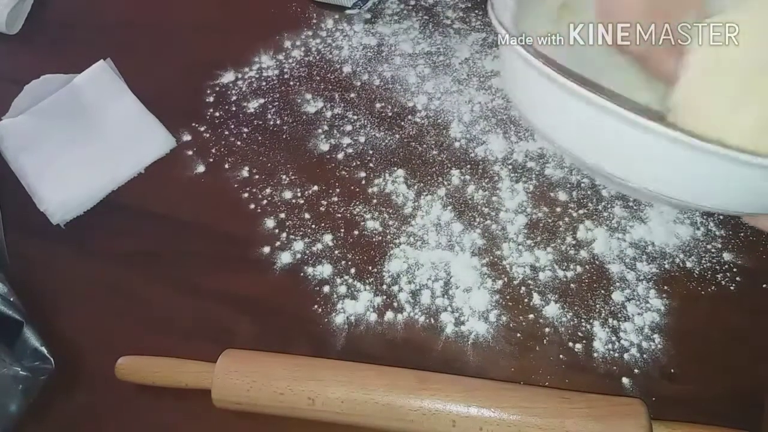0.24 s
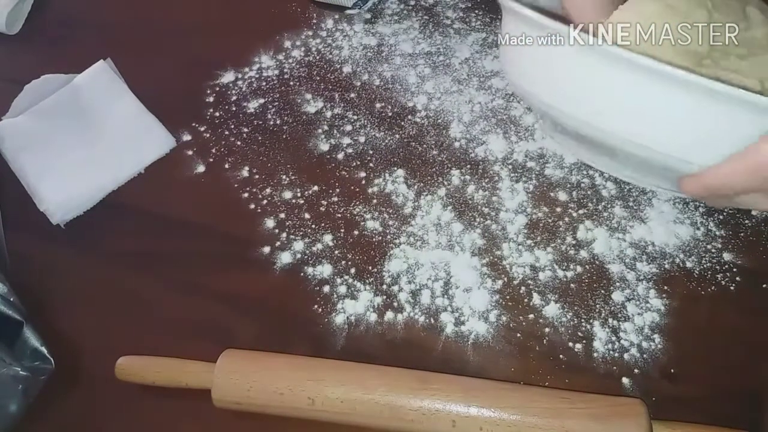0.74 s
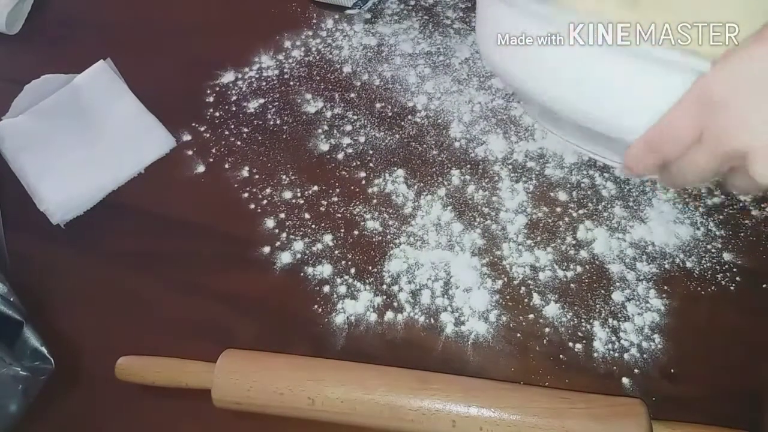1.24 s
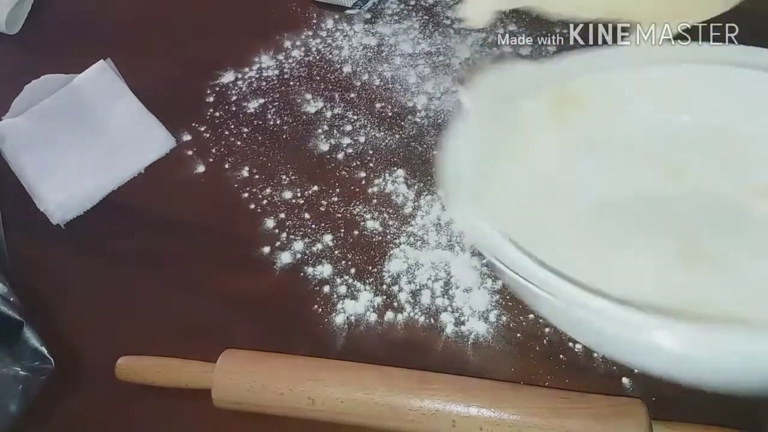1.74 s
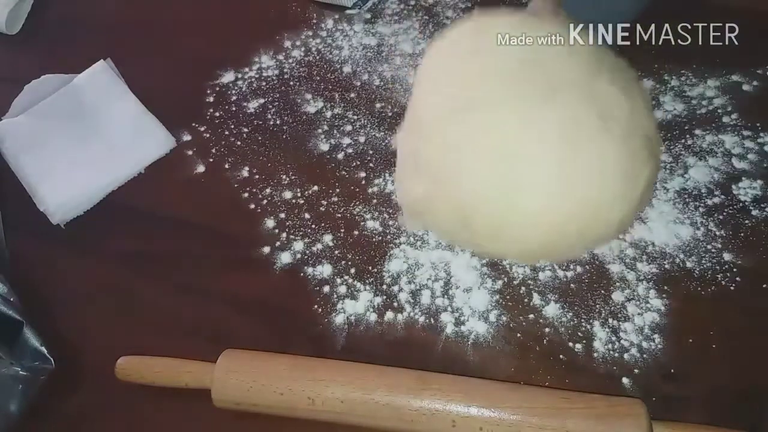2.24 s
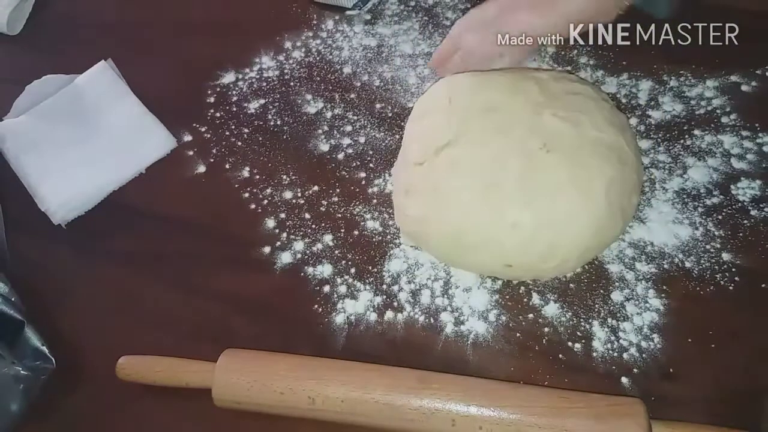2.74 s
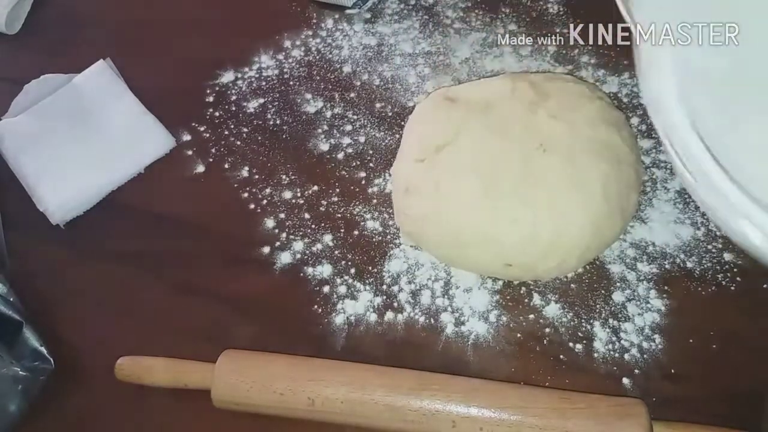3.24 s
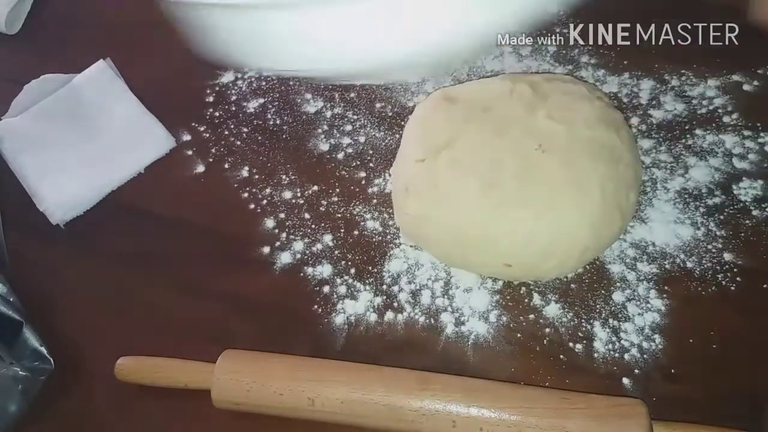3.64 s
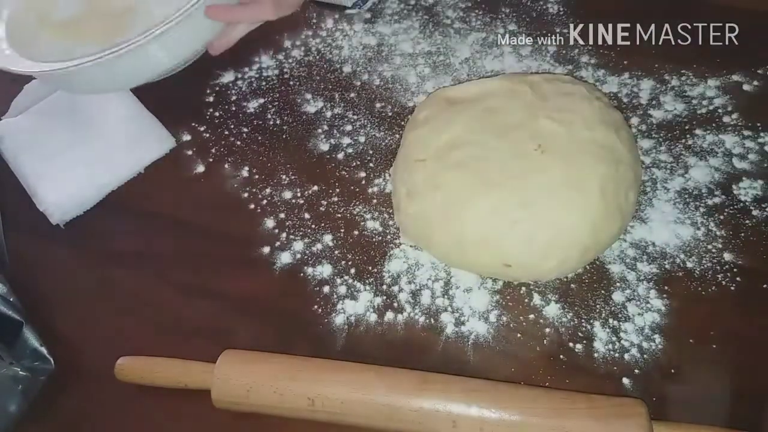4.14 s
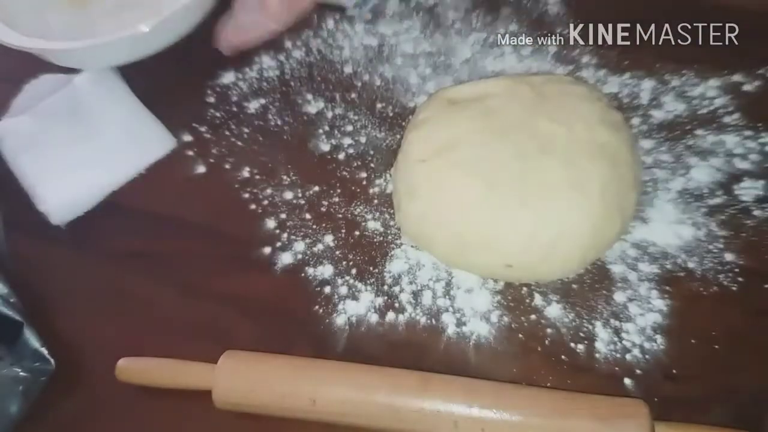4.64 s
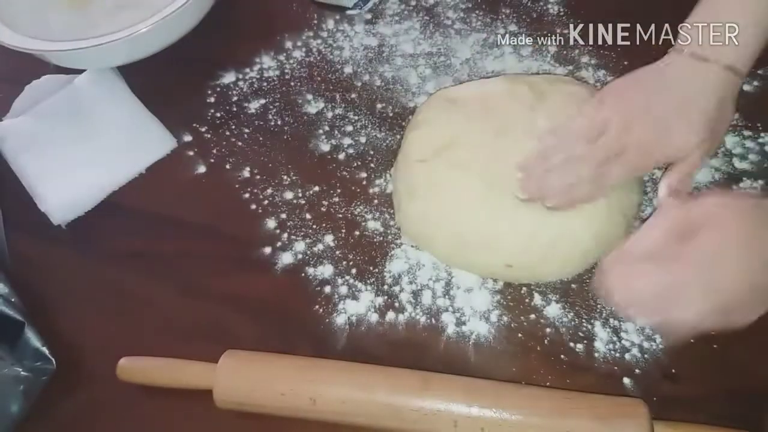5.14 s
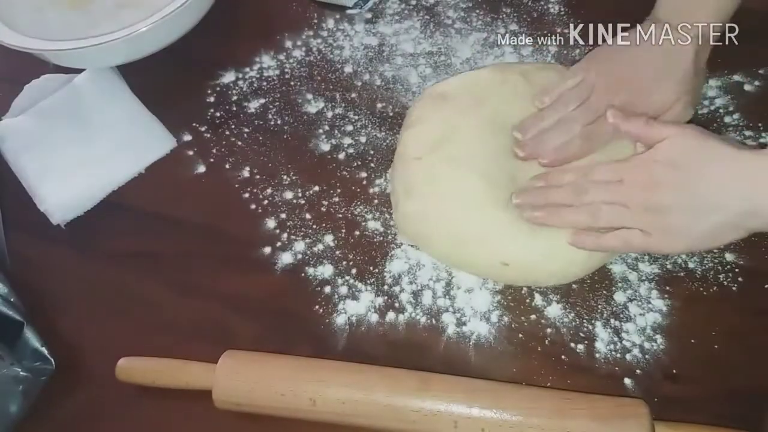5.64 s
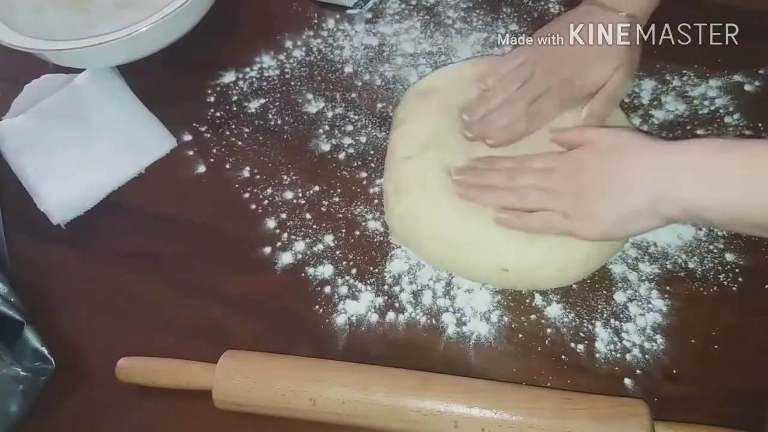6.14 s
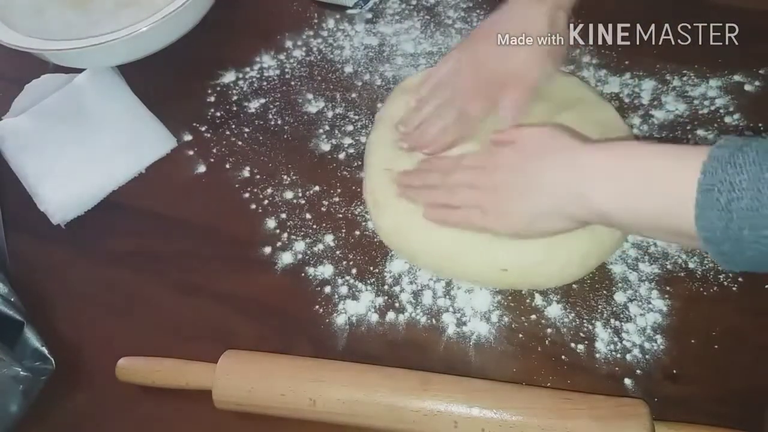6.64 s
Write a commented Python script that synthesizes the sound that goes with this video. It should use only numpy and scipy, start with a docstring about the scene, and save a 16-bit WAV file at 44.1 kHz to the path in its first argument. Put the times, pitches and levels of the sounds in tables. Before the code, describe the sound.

A bowl is rapped and shifted, dough handling rustles softly on a floured wooden table, then heavy wooden bangs shake the tabletop before quiet rubbing.

```python
"""A knuckle raps a bowl, the bowl shifts with small clinks and hums as it is dragged. Hands turn dough out of it
onto a floured wooden table, fingers slide on its wall and a bracelet tinkles; then the bowl is set down hard
and rocks. Throughout, hands and flour rustle, a wall clock ticks and the microphone hisses. Struck things are
clicks that set off dying sines, rubbed things are coloured noise, and the room is noise that dies away."""
import sys
import numpy as np
from scipy import signal
from scipy.io import wavfile

SR = 44100
rng = np.random.default_rng(int(sys.argv[2]) if len(sys.argv) > 2 else 0)


def generate_wav(signal):
    """Clip the signal to [-1, 1] and save it as 16-bit WAV at the path in sys.argv[1]."""
    frames = np.transpose(np.atleast_2d(signal))
    scaled = np.clip(frames, -1, 1) * 32767
    pcm = np.round(scaled).astype(np.int16)
    wavfile.write(sys.argv[1], SR, pcm)


N = 303849  # length of the sound in samples


def amp(db):
    """Turn decibels into a plain multiplying factor."""
    return 10 ** (np.asarray(db) / 20)


def rms_one(x):
    """Scale a sound so that its average strength (rms) is 1."""
    return x / np.sqrt(np.mean(x ** 2) + 1e-20)


def at_hz(points, hz, column=1):
    """Read a table column between its points, along a log-frequency axis."""
    points = np.array(points)
    return np.interp(np.log(hz), np.log(points[:, 0]), points[:, column])


def band(x, low, high):
    """Keep only the part of a sound between two frequencies in Hz."""
    return signal.sosfilt(signal.butter(2, [low, high], "band", fs=SR, output="sos"), x)


def drift(rate):
    """Slow random wandering of spread 1: noise smoothed twice, with a corner at rate in Hz."""
    step = 40  # samples between two computed points
    r = np.exp(-2 * np.pi * rate * step / SR)
    noise = rng.standard_normal(N // step + 2002)
    slow = signal.lfilter([1], [1, -2 * r, r * r], noise)[2000:]  # skip the filter's start-up
    return np.interp(np.arange(N) / step, np.arange(len(slow)), rms_one(slow))


def ringing(modes, size=SR):
    """A struck body answers with sines that each lose 60 dB in their own time t60."""
    t = np.arange(size) / SR
    return sum(amp(db - 60 * t / t60) * np.sin(2 * np.pi * hz * t) for hz, db, t60 in modes)


def strike(times, levels_db, response):
    """Clicks at the given times each set off the response."""
    clicks = np.zeros(N)
    clicks[(np.asarray(times) * SR).astype(int)] = amp(levels_db)
    return signal.fftconvolve(clicks, response)[:N]


def strokes(start, held, levels_db, fall_db_s):
    """Loudness of rubbing strokes: each rises fast, holds and falls away; their powers add."""
    rise_db_s = 594.5
    t = np.arange(0, N + 32, 32) / SR
    start, held, levels_db = (np.reshape(c, (-1, 1)) for c in (start, held, levels_db))
    before = np.maximum(start - t, 0)
    after = np.maximum(t - start - np.abs(held), 0)
    lost_db = rise_db_s * before + fall_db_s * after
    loudness = np.sqrt(np.sum(amp(levels_db - lost_db) ** 2, axis=0))
    return np.interp(np.arange(N) / SR, t, loudness)


def coloured(spectrum, patchy_db, rate):
    """Noise in half-octave bands that flicker partly together and partly alone; rms 1."""
    out, together, white = 0, drift(rate), rng.standard_normal((2, N))
    lowest, highest = spectrum[0][0], spectrum[-1][0]
    edges = lowest * 2 ** np.arange(0, np.log2(highest / lowest) + .4, .5)
    for k, (low, high) in enumerate(zip(edges, edges[1:])):
        flicker_db = patchy_db * (.7 * together + drift(rate))
        gain = amp(at_hz(spectrum, np.sqrt(low * high)) + flicker_db)
        out = out + gain * band(white[k % 2], low, min(high, .45 * SR))
    return rms_one(out)


def puff(t60):
    """Room reflections as a half-second burst of dying noise with a total energy of 1."""
    t = np.arange(SR // 2) / SR
    noise = rng.standard_normal(len(t)) * amp(-60 * t / t60)
    return noise / np.sqrt(np.sum(noise ** 2))


def room_tail():
    """Dense reflections: noise that builds up within about 2 ms and dies band by band."""
    # How the room dies away. Each row: frequency in Hz, level in dB, time to fall 60 dB in seconds.
    echo_bands = [(140, -27, 0.89), (302, -11, 0.4), (655, -17.5, 0.49), (1553, -24, 0.45),
                  (2900, -28, 0.29), (6040, -49, 0.4), (12000, -64.5, .1)]
    # The wood's resonances, carried by the room. Each row: frequency in Hz, width in Hz, added level in dB.
    echo_peaks = [(653, 30, -4.0), (1200, 110, -6.0), (1800, 220, -5.5), (2900, 50, 5.5), (4950, 400, 3)]
    t, white = np.arange(SR) / SR, rng.standard_normal((2, SR))
    edges = 130 * 2 ** np.arange(0, 7, .5)  # half octaves
    tail = 0
    for k, (low, high) in enumerate(zip(edges, edges[1:])):
        hz = np.sqrt(low * high)
        fall_db = 60 * t / at_hz(echo_bands, hz, column=2)
        tail = tail + amp(at_hz(echo_bands, hz) - fall_db) * rms_one(band(white[k % 2], low, high))
    peaks = 0
    for hz, width, db in echo_peaks:
        peaks = peaks + amp(db) * signal.lfilter(*signal.iirpeak(hz, hz / width, fs=SR), tail)
    return (tail + peaks) * (1 - np.exp(-t / 0.00043))


def knocks():
    """A knock dents the wood, then the tabletop rings and the room answers; harder knocks have more treble."""
    # Knocks on the table. Each row: start in seconds, level in dB, weight (extra thud in dB),
    # clack (extra upper ring in dB), hardness (dB per step into the treble).
    knock_list = [(0.35, -45, 14.5, -2, 6.5), (0.389, -43, -3, 1, -11), (0.478, -48, -8, -2.5, 9.5),
                  (0.528, -53, -18, 4, 8), (0.735, -56, -15, -14.5, 23.5), (0.819, -58, 22.5, 8, 4),
                  (2.405, -59.5, 14, -3, 10), (2.45, -47, 9, -8.5, 10.5), (2.999, -54.5, 1, 4.5, 6),
                  (3.308, -35, -18, -15.5, 7), (3.333, -42.5, -6, -5, -4), (3.66, -69.5, 7, 9.5, 17.5),
                  (4.28, 0, 4, -6, 6.5), (4.293, -6, 3.5, -2, -1), (4.411, -6, -4, -2.5, 6),
                  (4.446, -5, 5, -6, 2.5), (4.678, 3, 2, 1.5, 1), (4.7, -17.5, -2, 16.5, -9.5),
                  (4.735, -2, -4, 2, 3), (4.762, -2, 0, -20.5, 6.5), (4.789, -15, 11.5, 1.5, -18),
                  (5.25, -64, -6, 14.5, 12.5), (5.908, -69, 29.5, -8.5, 24.5), (6.087, -61, 8, 5.5, 10),
                  (6.349, -58.5, 20, -9, 11)]
    # Pitch ranges (registers) of a knock. Each row: low edge in Hz, high edge in Hz.
    registers = [(92, 170), (170, 330), (330, 580), (580, 1000), (1000, 2200), (2200, 4500), (4500, 12000)]
    # One value per register: the usual level in dB, before a knock's own settings are added.
    register_db = [-12, -9, 0.0, -1.5, -10.5, -21.5, -33.5]
    # One value per register: how many times weight, clack and hardness count there.
    weight_share = [1, .5, 0, 0, 0, 0, 0]
    clack_share = [0, 0, 0, 1, 1, 1, 0]
    hard_steps = [0, 0, 0, 0, 1, 2, 2]
    # Ringing of the tabletop. Each row: frequency in Hz, level in dB, time to fall 60 dB in seconds.
    tabletop = [(108.6, -16, 0.56), (123.45, -3, 0.44), (181, -16, .5), (213.4, -13, 0.66),
                (270.6, -12, 0.78), (282, -14.5, .36), (366.2, -14, 0.42), (391.6, -20.5, 0.5),
                (471.2, -20.5, 0.53), (490.3, -17, 0.43), (523, -23, 0.27), (539, -22.5, 0.43),
                (613, -22, 0.38), (684, -8, 0.2), (818, -16.5, .35), (877, -20, 0.25), (946, -28.5, 0.4),
                (1092, -26, 0.28), (1188, -24, .35), (1289, -26, .3), (1735, -15, 0.081),
                (1998, -25.5, 0.15), (1990, -29, 0.11), (2340, -31.5, .2), (2710, -33, 0.083),
                (2893, -36, 0.44), (2920, -39, 0.6), (2850, -37.5, 0.34), (3250, -42, 0.21),
                (3636, -43, 0.22), (4190, -36, 0.16), (4650, -45, .15)]
    # The dented wood answers first, and briefly. Each row: the same columns as the tabletop.
    contact = [(422, 6.5, 0.018), (761, 0, 0.0087), (1120, -12, 0.011), (1940, -11.5, .012),
               (2950, -25.5, 0.02), (3595, -30.5, 0.012), (4800, -19.5, 0.0083)]
    room_db = 1.7
    body = ringing(tabletop) + ringing(contact)
    body[1] += amp(-17.0)  # the sharp edge of the contact
    out = 0
    for turn in range(2):  # two noise tails, used in turn, vary the echo from knock to knock
        echo = room_tail()
        s, knock_db, weight_db, clack_db, hard_db = np.transpose(knock_list[turn::2])
        for k, (low, high) in enumerate(registers):
            narrowed = band(np.array([body, echo]), low / 1.74, high * 0.88)
            near, far = band(narrowed, low, high)
            level_db = knock_db + register_db[k] + weight_share[k] * weight_db
            level_db = level_db + clack_share[k] * clack_db + hard_steps[k] * hard_db
            response = (near + amp(room_db) * far) / np.abs(near).max()
            out = out + strike(s, level_db, response)
    return out


def rap():
    """A knuckle raps the bowl: a dry snap, a short ring, and both again from the walls."""
    # Ring of the rapped bowl. Each row: frequency in Hz, level in dB, time to fall 60 dB in seconds.
    rap_ring = [(410, -14, 0.21), (500, -8, 0.19), (630, -4.5, 0.13), (777, 8, 0.1), (898, 5, 0.11),
                (1033, 4, .12), (1130, 2, 0.13), (1250, 3.5, 0.05), (1480, -10, .12), (1754, 3.5, 0.11),
                (1983, -0.5, 0.14), (2570, -6.5, 0.13), (4780, -22, .1)]
    # Snap of the knuckle. Each row: the same columns as the ring.
    rap_snap = [(650, 7, 0.017), (1670, -1, 0.017), (3340, -46, 0.0056), (4650, -19, 0.0039)]
    rap_s, rap_db, walls_db = .0732, -19.5, -25
    blow = ringing(rap_snap) + amp(-18.0) * ringing(rap_ring)
    blow = band(blow, 280.0, 4860)  # the soft knuckle cuts the top
    walls = signal.fftconvolve(blow, puff(t60=0.46))[:SR]
    return strike([rap_s], rap_db, blow) + strike([rap_s + .006], walls_db, walls)


def handling():
    """Hands move dough, bowl and sleeves: each move rumbles through the table, rubs and rustles; the loud
    rustles at 4.29, 4.68 and 4.79 s are the crack of the hard knocks."""
    # Moves of the hands, and the crack of the hard knocks at 4.29, 4.68 and 4.79 s. Each row: start in seconds,
    # # time held in seconds, rumble level in dB, rubbing level in dB, rustle level in dB.
    moves = [(0.01, 0.011, -59, -60.5, -59), (0.198, 0.032, -59, -61.5, -60.5), (.11, 0.074, -66, -61, -66),
             (.3, 0.039, -74, -62.5, -66), (0.372, 0.092, -54, -60.5, -60.5), (0.52, 0.012, -53, -61, -60),
             (0.602, 0.14, -61.5, -59, -63.5), (0.85, 0.03, -57.5, -69, -73),
             (0.94, 0.027, -62, -64.5, -73), (1.13, 0.038, -60, -61, -62), (1.23, .03, -63.5, -70, -66),
             (1.418, 0.091, -64.5, -68.5, -65.5), (1.663, 0.007, -64.5, -70, -61.5),
             (1.899, 0.017, -63, -65.5, -71), (2.149, 0.1, -67, -64, -77), (2.28, 0.017, -88, -69, -67),
             (2.39, 0.034, -59, -66, -82), (2.598, 0.14, -68.5, -63, -62.5), (2.84, 0.088, -67, -67, -90),
             (3.02, 0.13, -67.5, -66.5, -90), (3.12, 0.045, -72, -65.5, -59.5),
             (3.17, 0.028, -70, -62.5, -62), (3.25, 0.041, -80, -69, -65), (3.318, 0.01, -49, -58.5, -63),
             (3.375, 0.0072, -72, -58, -57.5), (3.44, 0.058, -73, -69, -58.5), (3.54, .03, -64, -65.5, -76),
             (3.66, 0.061, -70, -64.5, -75), (3.79, 0.026, -65, -68, -72), (4.02, 0.02, -63.5, -73.5, -78),
             (4.15, 0.016, -83.5, -64.5, -75), (4.29, 0.011, -73.5, -64, -55.5),
             (4.41, 0.28, -77.5, -57.5, -62), (4.68, 0.051, -74, -76, -50.5),
             (4.791, 0.052, -75.5, -62.5, -50), (5.068, 0.036, -44.5, -60.5, -63),
             (5.169, 0.037, -68, -57, -66), (5.31, 0.063, -60, -64.5, -61.5),
             (5.448, 0.051, -53, -60.5, -64), (5.67, 0.049, -67.5, -66, -84), (5.799, 0.018, -64, -83, -69),
             (5.9, 0.053, -58.5, -61, -61), (6.041, .03, -66.5, -84, -73),
             (6.15, 0.053, -60.5, -65.5, -66.5), (6.345, 0.032, -59, -60.5, -63.5),
             (6.47, 0.11, -60.5, -75, -75), (6.62, 0.024, -58.5, -67, -67),
             (6.75, 0.065, -59, -60.5, -65.5)]
    # Colours of the three noises. Each row: frequency in Hz, relative strength in dB per Hz.
    rumble_colour = [(24, -70), (40, 8), (85, -21), (124, 3.5), (325, -12.5), (404, -13), (452, -12),
                     (501, -36), (600, -12), (780, -59), (1320, -120)]
    rubbing_colour = [(180, -42), (300, -18), (364, -4.5), (403, 3.5), (441, -7), (873, -8), (2070, -8),
                      (2670, -11.5), (5160, -12.5), (6500, -1), (8450, -63), (14300, -120)]
    rustle_colour = [(2940, -18.5), (5000, -2.5), (6450, 5), (7640, -1), (9440, -1), (10700, -3.5),
                     (15400, -9.5)]
    start, held, rumble_db, rubbing_db, rustle_db = np.transpose(moves)
    rumble = strokes(start, held, rumble_db, fall_db_s=114.5)
    rumble = rumble * coloured(rumble_colour, patchy_db=1.5, rate=10.0)
    rubbing = strokes(start, held, rubbing_db, fall_db_s=111.5)
    rubbing = rubbing * coloured(rubbing_colour, patchy_db=1.0, rate=8.0)
    rustle = strokes(start, held, rustle_db, fall_db_s=203)
    rustle = rustle * coloured(rustle_colour, patchy_db=.8, rate=8.0)
    return rumble + rubbing + rustle


def rubbed_bowl():
    """Fingers slide on the bowl, and the friction noise sings in the resonances of its wall."""
    # Slides of the fingers. Each row: start in seconds, time held in seconds, level in dB.
    slides = [(2.66, 0.06, -66.5), (2.77, .18, -70), (3.49, 0.028, -56.5), (3.66, 0.027, -63),
              (3.75, 0.087, -75)]
    # Resonances of the wall. Each row: frequency in Hz, width in Hz, relative level in dB.
    resonances = [(1090, 100, -10), (2010, 200, 3), (2700, 220, -2), (3240, 160, 0), (5050, 200, -2)]
    white = rng.standard_normal(N)
    wall = 0
    for hz, width, db in resonances:
        wall = wall + amp(db) * rms_one(band(white, hz - width / 2, hz + width / 2))
    return strokes(*np.transpose(slides), fall_db_s=297) * rms_one(wall)


def hum():
    """The dragged bowl's foot sticks and slips, giving a wavering, swelling tone and its octave."""
    start_s, end_s, fade_s = 0.53, .79, 0.083
    hum_hz, hum_db, swell_db_s, octave_db = 299, -54.5, 6, -11
    t = np.arange(N) / SR
    on = np.clip(np.minimum(t - start_s, end_s - t) / fade_s, 0, 1)
    phase = 2 * np.pi * np.cumsum(hum_hz * (1 + .025 * drift(30.0))) / SR
    level_db = hum_db + swell_db_s * np.clip(t - start_s, 0, 1) + 3.7 * drift(22.0)
    tone = np.sin(phase) + amp(octave_db) * np.sin(2 * phase)
    return np.sqrt(2) * on * amp(level_db) * tone


def clinks():
    """Two small touches on the bowl's rim as it shifts, each a short high ring."""
    # The touches. Each row: start in seconds, level in dB.
    touches = [(0.4781, -50.5), (0.5262, -55)]
    # Ring of the rim. Each row: frequency in Hz, level in dB, time to fall 60 dB in seconds.
    rim = [(1750, 1.5, 0.068)]
    return strike(*np.transpose(touches), ringing(rim))


def tinkle():
    """Tiny metal links of a bracelet touch, each touch with its own mix of tones; the room blurs them."""
    # Touches of the links. Each row: start in seconds, level in dB before the direct/room mix.
    touches = [(3.1223, -51), (3.1667, -42), (3.1894, -50), (3.2021, -44.5), (3.2194, -54), (3.2779, -47.5),
               (3.2944, -56), (3.3094, -58), (3.433, -48), (3.4401, -43), (3.4514, -60)]
    # Tones of the links. Each row: frequency in Hz, level in dB, time to fall 60 dB in seconds.
    link_modes = [(12090, 3, 0.063), (12200, -6, .04), (12400, -3, .04), (12800, -1, .03),
                  (14000, -3, .025)]
    s, db = np.transpose(touches)
    chance_db = rng.normal(0, 4, (len(s), len(link_modes)))
    direct = 0
    for k, mode in enumerate(link_modes):
        direct = direct + strike(s, db + chance_db[:, k], ringing([mode], size=SR // 4))
    blurred = signal.fftconvolve(direct, puff(t60=0.11))[:N]
    return amp(-14.0) * direct + amp(-6.5) * blurred


def clock():
    """A wall clock gives about one dull tick a second, smeared by the room into a short puff."""
    # Ring of the clock case. Each row: frequency in Hz, level in dB, time to fall 60 dB in seconds.
    case = [(444, 1, 0.06), (4970, -23, 0.04), (9800, -16.5, .03)]
    first_s, period_s, tick_db = .135, .9975, -49
    times = np.arange(first_s, N / SR, period_s)
    return strike(times, tick_db, signal.fftconvolve(ringing(case), puff(t60=0.6)))


def scene():
    """All sources together, as one channel."""
    struck = knocks() + rap()
    rubbed = handling() + rubbed_bowl() + hum()
    small = clock() + tinkle() + clinks()
    return (struck + rubbed + small)[None]


def record(dry):
    """The microphone drops deep bass and hisses; a limiter holds the bangs down and the top is cut."""
    # Colour of the hiss. Each row: frequency in Hz, relative strength in dB per Hz.
    hiss_colour = [(32, -40), (55, -8), (155, -4), (300, -8.5), (459, -12.5), (932, -13), (2030, -18),
                   (4420, -18.5), (6140, -28), (7960, -19), (15400, -28)]
    hiss_db, offset = -66.5, -.0005
    dip_hz, dip_width_hz, dip_share = 6450, 4500, 0.69  # the microphone port is partly deaf here
    limit_db, release_db_s = -2.5, 120
    dry = signal.sosfilt(signal.butter(3, 92, "high", fs=SR, output="sos"), dry)
    dry = dry + amp(hiss_db) * coloured(hiss_colour, patchy_db=1.43, rate=6.0)
    dry = dry - dip_share * signal.lfilter(*signal.iirpeak(dip_hz, dip_hz / dip_width_hz, fs=SR), dry)
    over_db = np.maximum(20 * np.log10(np.abs(dry[0]) + 1e-9) - limit_db, 0)
    # the limiter catches each peak, then lets go at a steady rate
    fall = release_db_s * np.arange(N) / SR
    held_db = np.maximum.accumulate(over_db + fall) - fall
    smooth_db = signal.lfilter([.05], [1, -.95], held_db)
    limited = dry * amp(-np.roll(smooth_db, -60))  # it looks 60 samples ahead
    return offset + signal.sosfilt(signal.ellip(12, .5, 70, 15530, fs=SR, output="sos"), limited)


dry = scene()
out = record(dry)
generate_wav(out)
```